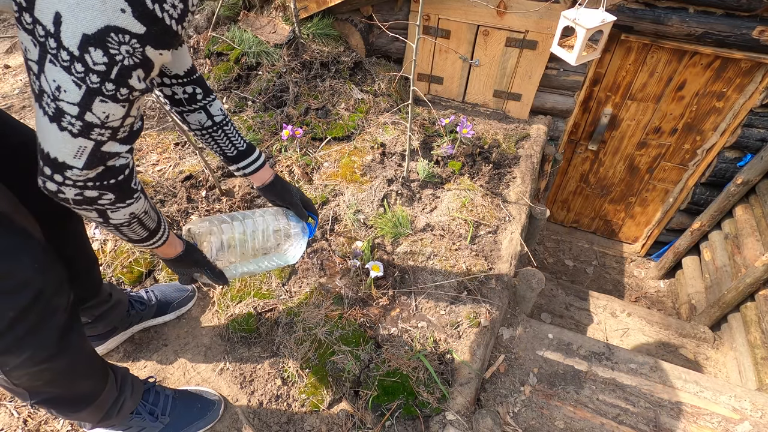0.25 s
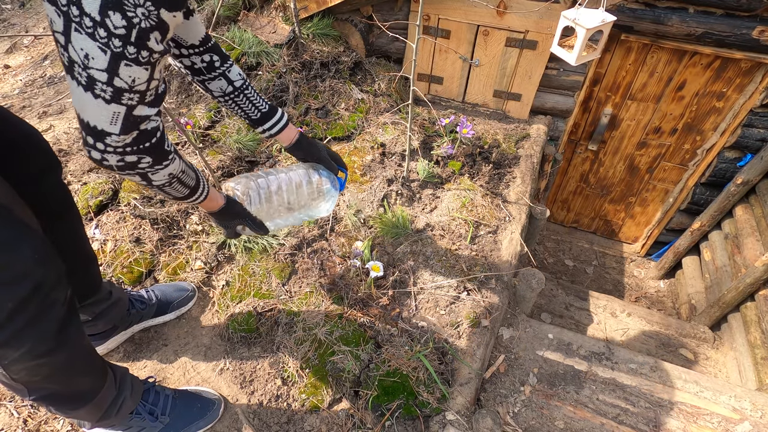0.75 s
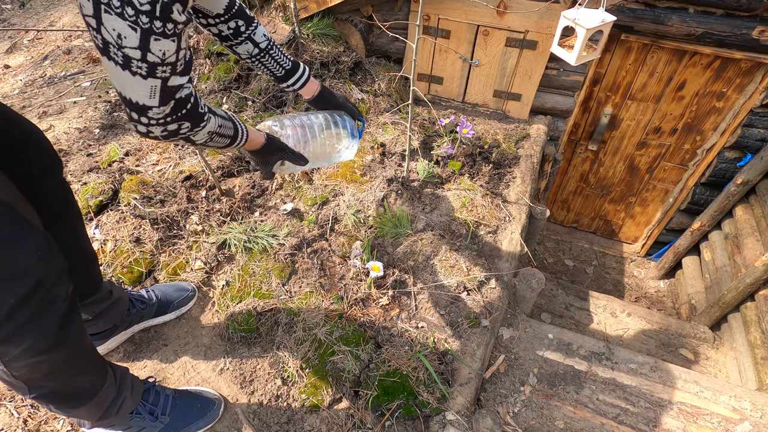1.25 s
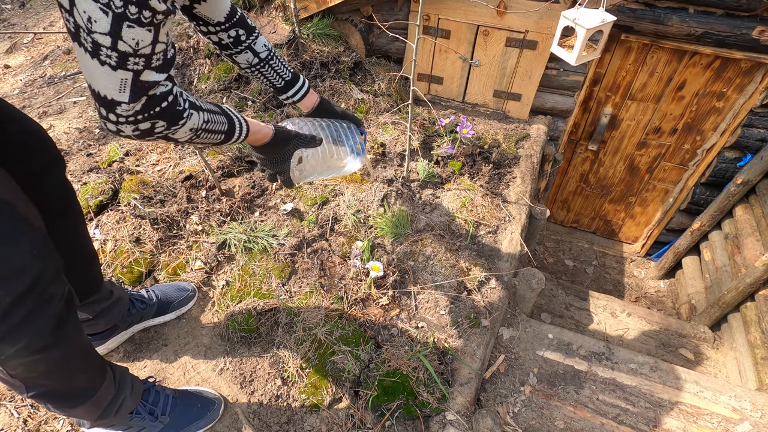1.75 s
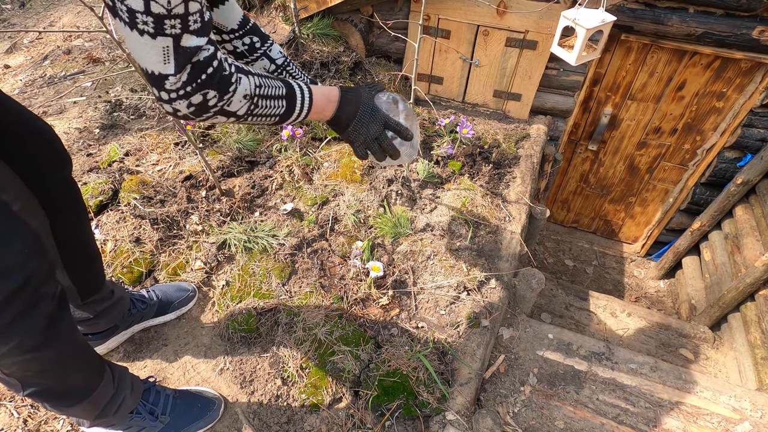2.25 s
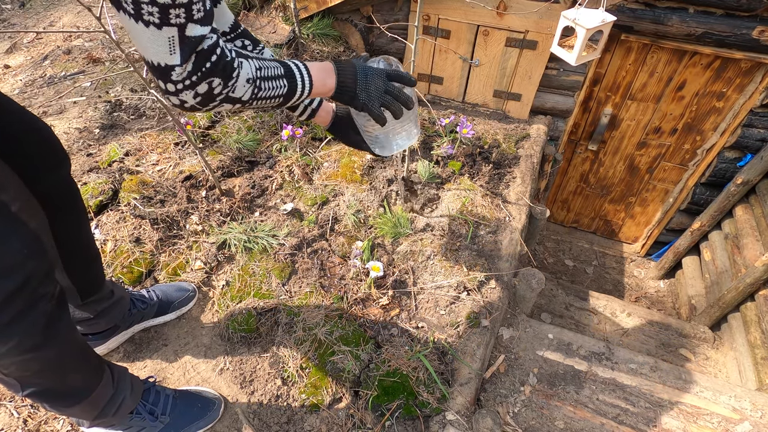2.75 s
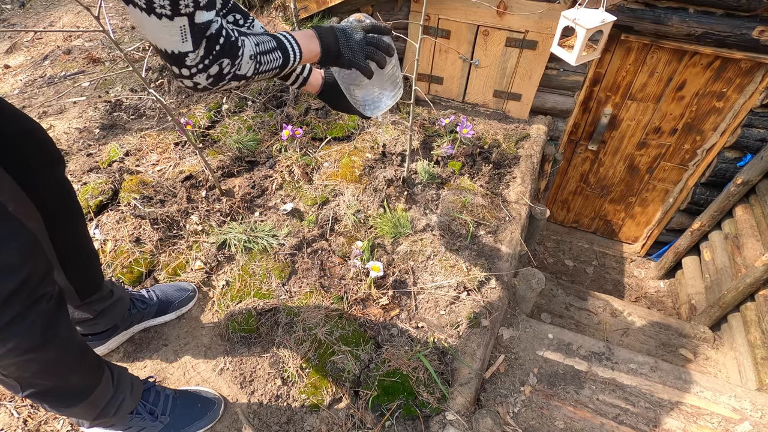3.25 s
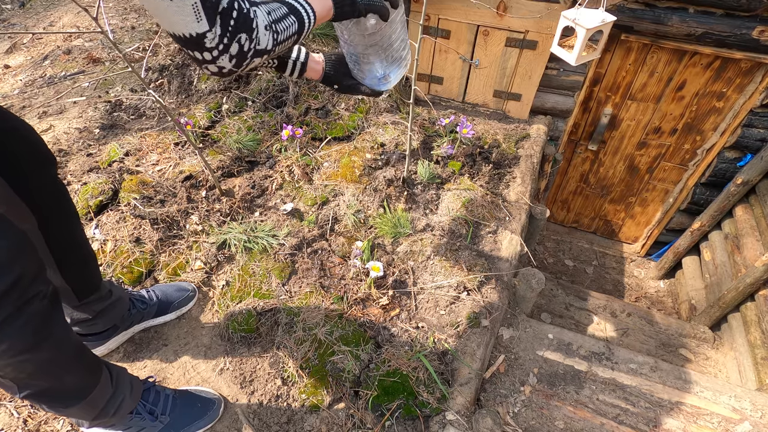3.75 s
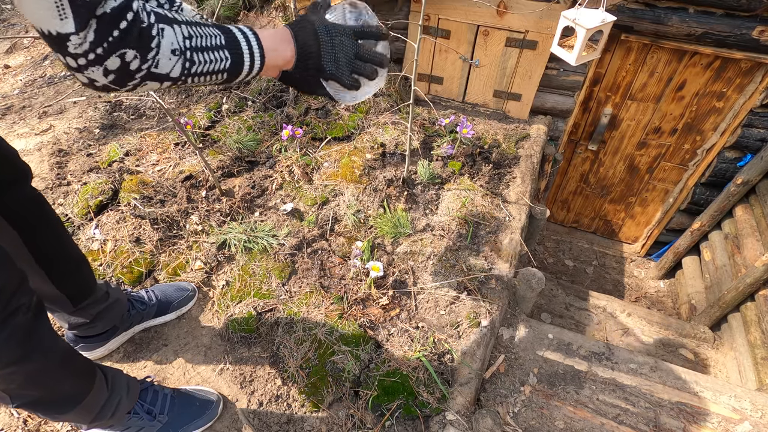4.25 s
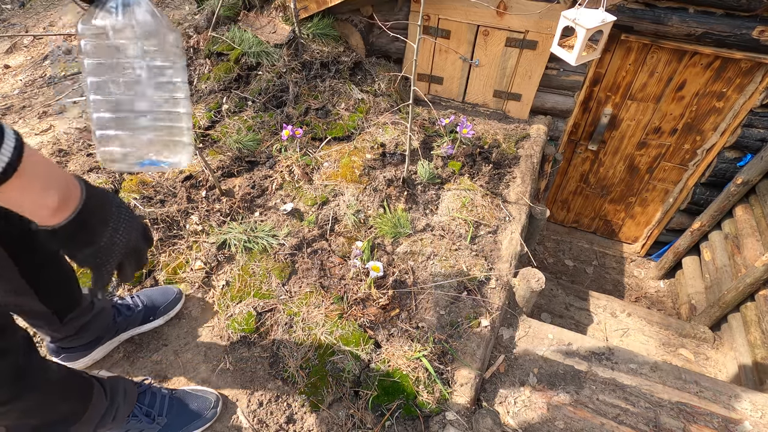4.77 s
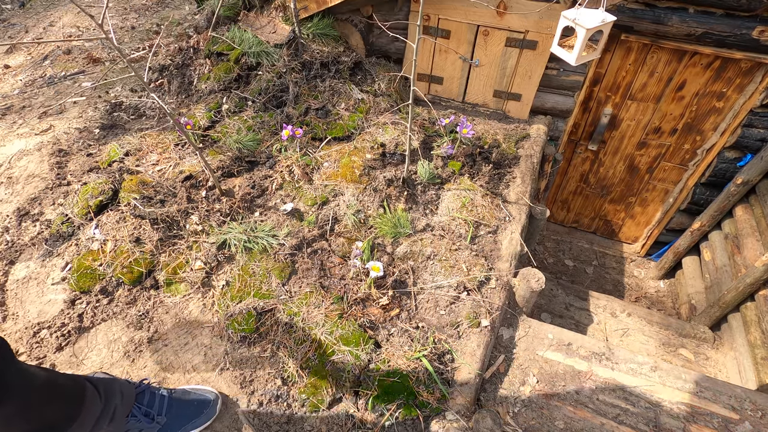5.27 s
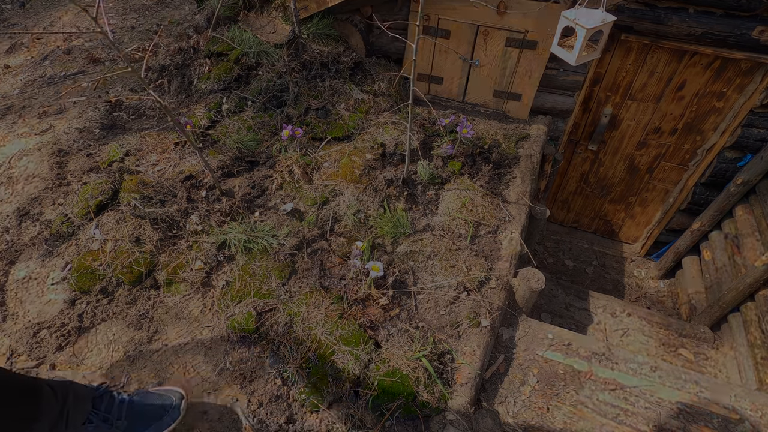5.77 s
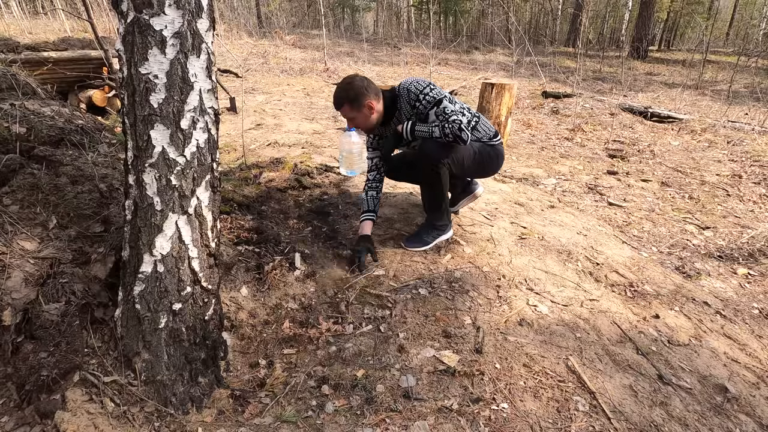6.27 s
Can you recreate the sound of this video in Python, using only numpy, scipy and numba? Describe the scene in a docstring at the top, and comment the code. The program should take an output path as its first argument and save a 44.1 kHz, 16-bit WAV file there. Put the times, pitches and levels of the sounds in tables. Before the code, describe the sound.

Open air with a soft hush and low wind rumbling in small gusts on the microphone. From 0 to 0.3 s two quick bright spatters of water hit dry soil a metre or two away; a faint rising bird whistle comes at 0.25 s and another at 1.2 s. From 0.6 to 2.5 s the water is a weak, hissy trickle in spells, with a brief livelier splash near 1.9 s. At 2.6 s it surges, fat bubbly drops plopping around 2.9 to 3.2 s, then pours again until about 4 s. Thin plastic crackles from 3.25 s, loudest with sharp pops at 3.8 to 4.0 s, ending in ticks near 4.3 s. Sleeves brush and water swills at 4.4 to 4.9 s. At 5.1 to 5.35 s the hollow bottle knocks and crunches down on grit. A hush dips near 5.85 s; from 6.1 to 6.5 s a hand sweeps loose earth in gritty strokes, now mono.

```python
"""Water is emptied in spells from a big thin plastic bottle over a dry flower bed, a metre or two away.
The stream is thousands of tiny rising rings plus fine spray; each fat drop is a bubble ring with smaller
bubbles and a short splash. The squeezed bottle crackles in runs of clicks through its wall rings, then its
base crunches and knocks hollowly as it is set down. A hand sweeps loose earth: dense coloured clicks.
Filtered noise makes the wind at the microphone and the hush; a far bird whistles twice, as rising sines."""
import sys
import numpy as np
from scipy import signal
from scipy.fft import rfft, irfft, next_fast_len
from scipy.io import wavfile
from scipy.ndimage import uniform_filter1d, map_coordinates
from numba import njit

SR = 44100
rng = np.random.default_rng(int(sys.argv[2]) if len(sys.argv) > 2 else 0)


def master(y):
    """Save y as 16-bit WAV."""
    cut = np.clip(np.atleast_2d(y).T, -1, 1)
    pcm = np.round(cut * 32767)  # scale
    wavfile.write(sys.argv[1], SR, pcm.astype(np.int16))


N = 287521
T = np.arange(N) / SR  # s
SWELL_DB = 22  # a movement gains this much over its rise and loses it again over its release


def undb(db):
    """Decibels to gain."""
    return 10 ** (np.asarray(db) / 20)


def unit(x):
    """Scale to rms 1."""
    return x / np.sqrt(np.mean(x ** 2) + 1e-20)


def curve(rows, axis=1):
    """One column of a table, joined by straight lines in time."""
    rows = np.array(rows)
    return np.interp(T, rows[:, 0], rows[:, axis])


def colour(x, points, tilt_db=0):
    """Causal minimum-phase filter from (Hz, dB) points, tilted around 1500 Hz by dB per octave."""
    size = next_fast_len(len(x) + 4096, True)
    octave = np.log2(np.maximum(np.fft.rfftfreq(size, 1 / SR), 1))
    hz, db = np.transpose(points)
    shape = np.interp(octave, np.log2(hz), db)
    shape = shape + tilt_db * np.clip(octave - np.log2(1500), -2, 2)
    # folding the cepstrum forward in time makes the filter causal
    cepstrum = irfft(np.log(undb(shape)), size)
    cepstrum[1:size // 2] *= 2
    cepstrum[size // 2 + 1:] = 0
    return irfft(rfft(x, size) * np.exp(rfft(cepstrum)), size)[:len(x)]


def add(track, s, x):
    """Mix a sound into a track at time s."""
    i = max(int(s * SR), 0)
    track[i:i + len(x)] += x[:len(track) - i]


def ring(hz, t60, glide=0):
    """A damped ring of peak 1 that swells over its first cycle; its pitch may glide."""
    t = T[:int(1.3 * t60 * SR) + 64]
    attack = 1 - np.exp(-2 * hz * t)
    decay = np.exp(-np.log(1000) * t / t60)
    y = np.sin(2 * np.pi * hz * t * (1 + glide * t / t60 / 2)) * decay * attack
    return y / np.abs(y).max()


def walk(rate):
    """Slow chance: random levels held 1 / rate s and slewed twice."""
    k = int(SR / rate)
    steps = np.repeat(rng.standard_normal(N // k + 1), k)
    return 1.57 * uniform_filter1d(uniform_filter1d(steps, k), k)[:N]


def clicks(count, rate, spread_db):
    """Random clicks, many small and a few large; rate is per second."""
    size = undb(spread_db * np.minimum(rng.exponential(size=count), 4))
    return (rng.random(count) < rate / SR) * rng.choice([-1, 1], count) * size


@njit
def grains(kicks, hz, cycles, glide):
    """Each kick swells, rings for a few cycles and rises in pitch, like a tiny bursting bubble."""
    out = np.zeros(len(kicks))
    for i in np.nonzero(kicks)[0]:
        length = int(cycles[i] * SR / hz[i])
        for j in range(min(length, len(out) - i)):
            age, turn = j / length, hz[i] * j / SR
            envelope = np.exp(-6 * age) * (1 - np.exp(-2 * turn))
            out[i + j] += kicks[i] * envelope * np.sin(2 * np.pi * turn * (1 + glide * age))
    return out


def swell(s, rise, hold, release, db):
    """Gain of one movement: it rises to its level at time s, holds, dies away and stops."""
    below = np.maximum(s - T, 0) / rise + np.maximum(T - s - hold, 0) / release
    below = np.minimum(below, 2)
    return undb(db - SWELL_DB * below) * np.clip(2 - below, 1e-4, 1) ** 2


def rustle(moves, points, rate, spread_db):
    """Dense small contacts whose strength follows a few movements."""
    gain = np.sqrt(sum(swell(*move) ** 2 for move in moves))
    return unit(colour(clicks(N, rate, spread_db), points)) * gain * undb(0.43 * walk(30))


def spread(points, side_db):
    """Coloured noise, partly shared by both ports."""
    mid, side = (unit(colour(rng.standard_normal(N), points)) for _ in range(2))
    return mid + undb(side_db) * side * np.array([[1], [-1]])


# Tips of the bottle. Each row: full flow from in seconds, rise, hold and release in seconds,
# relative level in dB, central splash pitch in Hz, fine spray relative to that level in dB.
POURS = [(0.01, 0.086, 0.036, .14, -47.5, 3410, -14), (0.167, .1, 0.027, .1, -48, 3325, -21),
         (0.6, 0.054, 0.16, 0.18, -69, 5000, -1.5), (0.834, 0.18, 0.23, 0.38, -59.5, 4400, -5),
         (1.584, .06, 0.085, .3, -67.5, 4400, -0.5), (1.852, 0.22, .1, 0.16, -50.5, 3000, -7.5),
         (2.16, 0.25, 0.25, 0.34, -62.5, 3440, -1), (2.679, .15, 0.23, 0.15, -38.5, 2820, -12),
         (3.024, 0.21, 0.18, 0.19, -43.5, 3300, -5.5), (3.4, 0.065, 0.047, 0.17, -56.5, 2460, -0.5),
         (3.549, 0.058, .33, .16, -40, 2820, -8.5)]


def pouring():
    """The pours run into each other; returns the gain, splash pitch and spray dB of the stream."""
    power = np.array([swell(*pour[:5]) ** 2 for pour in POURS])
    total = power.sum(axis=0)
    pitch, spray_db = np.array(POURS)[:, 5:].T @ power / total  # the loudest pour dominates
    return np.sqrt(total), pitch, spray_db


# Tone of droplets bursting on soil. Each row: frequency in Hz, gain in dB.
SPLASH_COLOUR = [(300, -19), (800, -15.5), (1200, -2.5), (1700, -1.5), (3000, -1.5), (5200, 5),
                 (6500, -1.5), (9000, -3.5), (16000, -16)]
# Tone of the fine spray. Each row: frequency in Hz, gain in dB.
SPRAY_COLOUR = [(300, -23.5), (900, -4), (1600, 4.5), (3000, -2.5), (5200, 3), (7200, 3), (10000, -4.5),
                (12500, -1.5), (16000, -12)]


def stream(gain, pitch, fine_db, octaves=0.59, cycles=6, glide=0.21, surge_db=1.5,
           thinning=0.46, width_db=-4, full_db=-40):
    """Droplets and fine spray burst on the soil; a weak trickle thins out. Returns middle and side."""
    flow = np.clip(gain / undb(full_db), .03, 1) ** thinning  # share of the full grain rate
    hz = np.clip(pitch * 2 ** (octaves * rng.standard_normal(N)), 600, 15000)
    lengths = cycles * np.exp(0.32 * rng.standard_normal(N))
    bursts = grains(clicks(N, rate=4000 * flow, spread_db=4.0), hz, lengths, glide)
    patter = unit(colour(bursts * np.sqrt(hz / flow), SPLASH_COLOUR))  # short high grains strike harder

    def fine_spray(tilt_db):
        """A dense hiss of single clicks."""
        specks = clicks(N, rate=5000 * flow, spread_db=7.0) / np.sqrt(flow)
        return undb(fine_db) * unit(colour(specks, SPRAY_COLOUR, tilt_db))

    middle = patter + fine_spray(tilt_db=0)
    side = undb(width_db) * fine_spray(tilt_db=2.5)
    return np.array([middle, side]) * gain * undb(surge_db * walk(45))


def stray_drops(gain, pitch, rate=50, size_db=1, follow=0.98, octaves=.45, cycles=18, glide=0.13):
    """Middling drops break off the stream at random; their strength follows the stream."""
    hz = np.clip(pitch * 2 ** (octaves * rng.standard_normal(N)), 1000, 9000)
    kicks = clicks(N, rate, spread_db=2.0) * undb(size_db) * gain ** follow
    return grains(kicks, hz, cycles * np.exp(0.44 * rng.standard_normal(N)), glide)


# The fattest drops. Each row: start in seconds, relative level in dB, starting pitch in Hz,
# ring time (60 dB decay) in seconds.
DROPS = [(0.0246, -33, 2200, 0.029), (0.037, -32, 4100, 0.0078), (0.1693, -33.5, 3760, .012),
         (0.184, -30, 4860, .008), (0.2012, -29, 2170, 0.013), (0.2387, -40.5, 1500, 0.006),
         (0.628, -43, 5200, .011), (0.8195, -37, 5300, 0.018), (0.9196, -33.5, 4700, 0.018),
         (0.953, -40, 4270, .012), (1.1583, -43, 4570, 0.0086), (1.6636, -42.5, 5740, .016),
         (1.939, -27.5, 2680, 0.0047), (2.6786, -24, 3360, 0.0094), (2.7583, -28, 2330, .014),
         (2.9074, -14, 1900, 0.0076), (2.918, -20.5, 2060, 0.019), (3.0353, -23, 5400, .005),
         (3.054, -25.5, 1605, .025), (3.085, -26, 1680, 0.028), (3.1503, -18, 3690, 0.0067),
         (3.1754, -17.5, 3730, 0.0027), (3.2222, -21, 4200, 0.0035), (3.5403, -22.5, 1860, 0.0049),
         (3.7658, -24.5, 3620, 0.0079)]


def drops(splash_db=-11, splash_s=0.0022, glide=0.092, gain_db=-2, satellite_db=-10,
          satellite_s=0.0038, count=5):
    """A fat drop rings a bubble, sheds smaller ones and throws up a short splash near its pitch."""
    out, t = np.zeros(N), T[:2000]
    chances = rng.random((len(DROPS), count, 2))
    for (s, db, hz, t60), chance in zip(DROPS, chances):
        add(out, s, undb(db + gain_db) * ring(hz, t60, glide))
        for late, pitch in chance:
            bubble = ring(hz * 2 ** (1.3 * pitch - .5), 0.0044, glide)
            add(out, s + 2 * late * satellite_s, undb(db + satellite_db - 12 * late) * bubble)
        splash = rng.standard_normal(len(t)) * np.exp(-t / splash_s)
        band = [(hz / 4, -28), (hz * 0.46, 0), (hz * 1.2, -1), (hz * 2.3, -9), (hz * 6, -24)]
        add(out, s, undb(db + splash_db) * colour(splash, band))
    return out


# Ringing of the bottle wall. Each row: mode in Hz, width in Hz, gain in dB.
WALL = [(161.3, 27, -11.5), (343, 80, -2), (444, 140, -9), (807, 110, 1.5), (880.5, 10, -2), (1090, 70, 4),
        (1336, 44, -1.5), (1724, 117, 2.5), (1860, 70, 0), (1990, 140, -1), (2203, 82, -7), (2660, 58, -3),
        (2790, 56, -9.5), (3204, 85, -6), (3180, 70, -18), (3500, 200, -23.5), (4420, 77, -24),
        (5430, 790, -21)]


def wall_response(t):
    """Impulse response of the thin wall: damped modes, wider ones dying sooner, in alternating sign."""
    out = np.zeros(len(t))
    for k, (hz, width, db) in enumerate(WALL):
        strength = undb(db) * 2 * np.pi * width / SR * (-1) ** k
        out += strength * np.exp(-np.pi * width * t) * np.cos(2 * np.pi * hz * t)
    return out


# The bottle wall buckles; the rows after 5 s are the base crunching on gritty soil as it is set down.
# Each row: start in seconds, relative snap level in dB, snap pitch in Hz,
# relative crackle level in dB, crackle length (40 dB decay) in seconds, crackle tilt in dB per octave.
BUCKLES = [(2.791, -48, 780, -41.5, 0.092, -9), (2.848, -34, 1000, -39.5, 0.27, -4),
           (3.258, -35, 1540, -27, 0.045, -3), (3.266, -27, 1250, -26.5, 0.067, -3),
           (3.281, -21.5, 2060, -36.5, 0.084, -6), (3.356, -31.5, 1470, -37, .047, -3),
           (3.395, -34, 1660, -35.5, 0.034, 2), (3.422, -29, 2160, -33.5, 0.051, 4),
           (3.552, -25.5, 2760, -34.5, 0.27, -5), (3.609, -17, 1146, -22, 0.064, -4),
           (3.648, -43, 1970, -23.5, 0.026, -0.5), (3.804, -30, 1120, -28, 0.15, -3.5),
           (3.832, -11.5, 1950, -14.5, .055, 0), (3.834, -9.5, 814, -19, .04, -.5),
           (3.847, -20.5, 1410, -19, .04, -0.5), (3.878, -19, 1320, -42, .013, 3),
           (3.931, -30, 1190, -32.5, .17, -2), (3.958, -13.5, 1170, -20.5, 0.069, -2.5),
           (3.997, -8.5, 1694, -23, 0.026, -3), (4.001, -15.5, 1100, -21.5, 0.037, -3),
           (4.088, -34, 1480, -38.5, 0.036, -2), (4.108, -32.5, 1480, -47, 0.12, -3.5),
           (4.152, -33, 1980, -32, 0.068, -0.5), (4.218, -35, 1530, -47, 0.2, -2.5),
           (4.259, -40, 950, -38, 0.052, 0.5), (4.29, -24, 1610, -32.5, 0.029, -1),
           (5.124, -45, 4870, -33, 0.053, 0), (5.136, -37, 1880, -26.5, 0.056, -0.5),
           (5.171, -28, 3250, -35, 0.09, 5.5), (5.22, -33, 2590, -40.5, 0.086, 0),
           (5.249, -35, 1880, -38, .06, 1.5), (5.265, -31.5, 1870, -34, 0.059, 0),
           (5.285, -26.5, 3720, -28, 0.08, -2), (5.305, -27.5, 914, -41, .067, -5.5),
           (5.33, -25, 3190, -27, 0.083, -0.5)]
# Direct sound of the creases. Each row: frequency in Hz, gain in dB.
CRACKLE_COLOUR = [(100, -15.5), (300, -11.5), (600, -6), (900, -0.5), (2000, -7), (3500, -5), (5300, -13),
                  (7000, -15.5), (10000, -30), (13000, -38), (16000, -33.5)]
# Ring of a snap. Each row: ratio to the snap pitch, gain in dB.
SNAP_MODES = [(0.662, -15.5), (0.999, -1), (1.65, -12)]


def buckles_and_crunches(rate=1800, spread_db=4, wall_db=1):
    """A snap rings and a run of small creases, or of grit under the base, rings the wall and dies away."""
    out, t = np.zeros(N), T[:8192]
    wall = wall_response(t)
    for s, snap_db, hz, crackle_db, length, tilt_db in BUCKLES:
        fade = np.exp(-np.log(100) * t / length) * (1 - np.exp(-t / 0.00079))
        creases = clicks(len(t), rate, spread_db) * fade
        wall_ring = signal.fftconvolve(creases, wall)[:len(t)]
        crackle = colour(creases, CRACKLE_COLOUR) + undb(wall_db) * wall_ring
        crackle = colour(crackle, [(100, -4.0), (5500, 3.5), (7500, -3), (15000, -12.5)], tilt_db)
        add(out, s, undb(crackle_db) * unit(crackle) * np.sqrt(np.mean(fade ** 2)))
        for ratio, mode_db in SNAP_MODES:
            mode = ring(hz * ratio, 0.015 + 8 / (hz * ratio), glide=-0.065)
            add(out, s, undb(snap_db + mode_db) * mode)
    return out


# Dry ticks of the plastic. Each row: start in seconds, relative level in dB.
TICKS = [(0.3265, -31.5), (2.2934, -29), (2.5227, -30.5), (3.1755, -8.5), (4.275, -24.5), (4.319, -16.5),
         (5.339, -13), (5.357, -14.5)]


def ticks(decay_s=0.0017, gain_db=-5):
    """Tiny bright snaps of the plastic: bursts of fast-decaying noise."""
    out, t = np.zeros(N), T[:600]
    for s, db in TICKS:
        add(out, s, undb(db + gain_db) * rng.standard_normal(len(t)) * np.exp(-t / decay_s))
    return colour(out, [(600, -29), (2500, -2), (5000, 1), (8000, -6.0), (15000, -21)])


# Blows that make the whole bottle boom. Each row: start in seconds, relative level in dB, pitch ratio.
KNOCKS = [(2.767, -34.5, 0.95), (3.265, -38.5, .84), (3.563, -35, 0.92), (3.65, -33, 0.94),
          (3.938, -34, 0.96), (4.175, -37, 0.93), (4.36, -43.5, .8), (5.14, -23.5, 1.0),
          (5.154, -18.5, 1.016), (5.178, -30.5, .98), (5.248, -26, .94), (5.314, -35.5, .96)]
# Boom of the hollow body. Each row: mode in Hz at pitch ratio 1, gain in dB, 60 dB decay in seconds.
BODY = [(157, -19, 0.73), (312.9, -5, 0.29), (406, 0, 0.27), (893, -16, 0.071)]
# Tone of water slapping inside. Each row: frequency in Hz, gain in dB.
SLAP_COLOUR = [(80, -28.5), (160, -12.5), (330, 2), (450, 0), (600, -9.5), (850, -9), (1300, -22.5),
               (3000, -46.5)]


def knocks(slap_db=-12, slap_s=0.021, boom_db=-5):
    """The hollow bottle booms when it flexes or meets the ground, and water slaps inside it."""
    boom, slap, t = np.zeros(N), np.zeros(N), T[:8192]
    for s, db, ratio in KNOCKS:
        for hz, mode_db, t60 in BODY:
            add(boom, s, undb(db + mode_db + boom_db) * ring(hz * ratio, t60))
        add(slap, s, undb(db + slap_db) * np.exp(-t / slap_s) * (1 - np.exp(-t / 0.0014)))
    boom *= undb(2.96 * walk(130))  # the moving water makes the boom uneven
    return boom + slap * unit(colour(rng.standard_normal(N), SLAP_COLOUR))


# Dull thumps of hands on the bottle and on the earth. Each row: start in seconds, relative peak in dB,
# pitch in Hz, 60 dB decay in seconds.
THUMPS = [(2.562, -31.5, 77, 0.046), (2.842, -22, 257, .044), (2.843, -28, 146, .09),
          (4.565, -31.5, 97, 0.072), (6.36, -39.5, 129.5, 0.044), (6.439, -44, 124, 0.11),
          (6.485, -44, 150, 0.11)]


def thumps():
    """Hands thump dully: single low rings, heavily damped."""
    out = np.zeros(N)
    for s, db, hz, t60 in THUMPS:
        add(out, s, undb(db) * ring(hz, t60))
    return out


# Water swills inside the tilted bottle. Each row: full level from in seconds,
# rise, hold and release in seconds, relative level in dB.
SWILLS = [(2.12, 0.12, 0.3, .12, -61), (4.39, 0.091, 0.0086, 0.059, -48.5), (4.49, 0.092, .23, 0.17, -51),
          (5.38, 0.09, 0.023, 0.42, -53.5), (5.56, .1, .02, .25, -60.5)]
# Tone of the swilling. Each row: frequency in Hz, gain in dB.
SWILL_COLOUR = [(150, -51.5), (350, 3.5), (600, -23), (900, -7.5), (1350, 0.5), (1750, -3.5), (2400, -14),
                (5000, -29.5), (15000, -56)]


def swill():
    """Water swills round inside the bottle: dense equal clicks in a hollow tone, swaying in level."""
    return undb(-2 + 2.2 * walk(22)) * rustle(SWILLS, SWILL_COLOUR, rate=1400, spread_db=0)


# The open bottle hums. Each row: full level from in seconds, rise, hold and release in seconds,
# relative level in dB.
HUMS = [(3.078, .15, 0.49, 0.36, -57)]


def hum(neck_hz=102.3, waver=.025, flicker_db=1.5):
    """The air in the nearly empty bottle hums at its neck: a low sine, unsteady in pitch and level."""
    phase = 2 * np.pi * np.cumsum(neck_hz * (1 + waver * walk(25))) / SR
    return unit(np.sin(phase)) * sum(swell(*row) for row in HUMS) * undb(flicker_db * walk(18))


# Sleeves and gloves brush as the bottle is carried off. Each row: full level from in seconds,
# rise, hold and release in seconds, relative level in dB.
BRUSHES = [(4.36, 0.19, 0.13, .3, -57.5), (4.85, 0.17, 0.4, .3, -62), (4.63, 0.19, 0.058, 0.12, -48),
           (5.405, 0.24, 0.019, 0.18, -53.5), (5.55, .1, 0.16, 0.25, -67.5)]
# Tone of the brushing cloth. Each row: frequency in Hz, gain in dB.
SLEEVE_COLOUR = [(200, -6), (700, -2.5), (1800, 3), (3000, -2), (5500, -2), (7500, -8.5), (10000, -15.5),
                 (15500, -18.5)]


def sleeves():
    """Sleeves and gloves brush: a dense rustle of small contacts."""
    return rustle(BRUSHES, SLEEVE_COLOUR, rate=5600, spread_db=3.5)


# Where the bottle is. Each row: time in seconds, left minus right level in dB,
# lag of the left port in samples.
PLACE = [(0, 0.5, 0), (0.8, 2.5, 0.041), (2.0, 0.5, 1.27), (3.0, 0, 1.32), (4.3, -1, 1.5), (4.7, 2.5, 0.94),
         (5.1, 1.5, 0), (5.8, 9, 0.041)]


def place(x):
    """Two microphone ports hear the bottle with a level difference and a lag."""
    pan_db, lag = curve(PLACE), curve(PLACE, axis=2)
    late = map_coordinates(x, [np.arange(N) - lag], order=3)
    return np.array([late * undb(pan_db / 2), x * undb(-pan_db / 2)])


# Tone thrown back by the surroundings. Each row: frequency in Hz, gain in dB.
SCATTER_COLOUR = [(200, -10.5), (1000, -1.5), (3000, 11), (6000, 11.5), (10000, 18), (15000, 1)]


def scatter(x, wet_db=-16, decay_s=0.0044, shift_rate=9, count=5):
    """Ground, steps and planks throw back a short bright smear, different per port and shifting."""
    t, bright, out = T[:1500], colour(x, SCATTER_COLOUR)[None], 0
    shares = np.array([walk(shift_rate) for _ in range(count)])
    shares /= np.sqrt(np.sum(shares ** 2, axis=0))  # the shifting mix keeps its total power
    for share in shares:
        echoes = rng.standard_normal((2, len(t))) * np.exp(-t / decay_s)
        echoes /= np.sqrt(np.sum(echoes ** 2, axis=1, keepdims=True))
        out = out + signal.oaconvolve(bright * share, echoes, axes=1)[:, :N]
    return undb(wet_db) * out


# A hand sweeps loose earth. Each row: full level from in seconds, rise, hold and release in seconds,
# relative level in dB.
SWEEPS = [(6.16, 0.066, 0.07, .2, -51), (6.255, 0.096, 0.097, 0.14, -42),
          (6.395, 0.042, 0.012, 0.11, -39.5), (6.47, 0.026, 0.026, .1, -46)]
# Tone of the swept earth. Each row: frequency in Hz, gain in dB.
SWEEP_COLOUR = [(180, -40.5), (300, -8.5), (808, -13.5), (1070, -7.5), (1840, -4), (2400, -7.5),
                (3630, -1.5), (7250, -8), (8420, -14), (11100, -20), (12300, -14.5), (15500, -23.5)]


def earth():
    """A hand sweeps loose earth: dense collisions of grains."""
    return rustle(SWEEPS, SWEEP_COLOUR, rate=7000, spread_db=3.5)


# The light breeze between gusts. Each row: time in seconds, relative level in dB.
BREEZE = [(0, -56), (.7, -50), (4.4, -47), (5.6, -50.5), (5.9, -63), (6.3, -49), (6.52, -46)]
# Gusts on the microphone. Each row: centre in seconds, half length (to 1/e) in seconds,
# relative level at both ports in dB, relative level of the eddy at the left port in dB.
GUSTS = [(0.123, 0.047, -41, -68), (.28, 0.047, -40.5, -65), (0.545, 0.12, -39, -43),
         (1.092, 0.05, -42.5, -48), (1.27, 0.061, -35.5, -45), (1.773, 0.076, -38.5, -45),
         (2.582, .025, -26.5, -46), (2.875, 0.028, -31.5, -52), (4.585, 0.05, -35, -23),
         (4.749, 0.055, -31.5, -31), (4.93, 0.043, -46, -32.5), (5.532, 0.035, -43.5, -38),
         (6.493, 0.083, -35, -74.5)]
# Tone of the wind rumble. Each row: frequency in Hz, gain in dB.
WIND_COLOUR = [(15, -11), (25, -0.5), (42, 2), (60, -12.5), (85, -16.5), (130, -35), (220, -39),
               (500, -65.5)]
# Tone of the wind flutter. Each row: frequency in Hz, gain in dB.
FLUTTER_COLOUR = [(30, -22), (70, -2.5), (110, 0), (180, -1.5), (300, -23), (600, -45)]


def wind(waver_db=2, eddy_db=-7, flutter_db=-40, flutter_follow=0.53, eddy_flutter_db=-19):
    """Breeze and gusts press on both ports alike and flutter more as they grow; eddies catch the left."""
    both = undb(curve(BREEZE) + waver_db * walk(8.4))
    left = both * undb(eddy_db)
    for s, length, both_db, left_db in GUSTS:
        gust = np.exp(-((T - s) / length) ** 2)
        both = np.hypot(both, undb(both_db) * gust)
        left = np.hypot(left, undb(left_db) * gust)
    rumble = spread(WIND_COLOUR, side_db=-22.5) * both
    flutter = spread(FLUTTER_COLOUR, side_db=-16.5) * undb(flutter_db) * both ** flutter_follow
    low, high = (unit(colour(rng.standard_normal(N), points)) for points in (WIND_COLOUR, FLUTTER_COLOUR))
    eddy = (low + undb(eddy_flutter_db) * high) * left
    return rumble + flutter + np.array([[1], [0]]) * eddy


# Rising bird whistles. Each row: start in seconds, length in seconds, start and end pitch in Hz,
# relative level in dB.
WHISTLES = [(.235, .135, 3450, 4480, -70), (1.17, .215, 3300, 4550, -67)]


def bird():
    """A far, thin whistle that rises and levels off, wavering on its way through the trees."""
    out = np.zeros(N)
    for s, length, start_hz, end_hz, db in WHISTLES:
        age = np.linspace(0, 1, int(length * SR))
        hz = start_hz + (end_hz - start_hz) * age ** 0.59
        hz = hz * (1 + 0.0027 * walk(440)[:len(age)])
        add(out, s, undb(db) * np.sin(np.pi * age) * np.sin(2 * np.pi * np.cumsum(hz) / SR))
    return out * undb(1.2 * walk(90))


# Open-air hush. Each row: time in seconds, relative level in dB.
AIR = [(0, -63.5), (1.5, -61), (2.3, -59), (5.0, -58), (5.6, -59), (5.85, -71), (6.2, -62), (6.52, -68)]
# Tone of the hush. Each row: frequency in Hz, gain in dB.
AIR_COLOUR = [(60, -7), (100, -11), (180, -4), (320, -6.5), (650, -15), (950, -20), (1350, -14.5),
              (2400, -26), (5300, -23), (7400, -25.5), (9000, -31.5), (12500, -42.5), (15500, -59.5)]


def hush():
    """Open-air hush: coloured noise, wide across the ports; it dips between pouring and sweeping."""
    return spread(AIR_COLOUR, side_db=-6.5) * undb(curve(AIR))


def scene():
    """Water and bottle share one moving place, going off to the left; earth is swept straight ahead."""
    gain, pitch, spray_db = pouring()
    patter, wide = stream(gain, pitch, spray_db)
    water = patter + stray_drops(gain, pitch) + drops() + swill()
    bottle = buckles_and_crunches() + ticks() + knocks() + thumps() + hum()
    near = water + bottle + sleeves()
    bed = place(near) + np.array([[1], [-1]]) * wide + scatter(near)
    return bed + earth() + wind() + bird() + hush()


# Tone of the left port. Each row: frequency in Hz, gain in dB.
LEFT_PORT = [(100, -1.5), (7500, 0), (10000, -9), (12500, -10), (16000, -13.5)]


def record(dry, mono_s=6.08, close_s=0.042, top_hz=15800):
    """The left port is duller than the right; the image closes to mono for the sweeping; a steep top cut."""
    ports = np.array([colour(dry[0], LEFT_PORT), dry[1]])
    closing = np.clip((T - mono_s) / close_s, 0, 1)
    ports = ports + closing * (ports.mean(axis=0) - ports)
    return signal.sosfilt(signal.ellip(10, .2, 80, top_hz, fs=SR, output="sos"), ports)


dry = scene()
out = record(dry)
master(out)
```